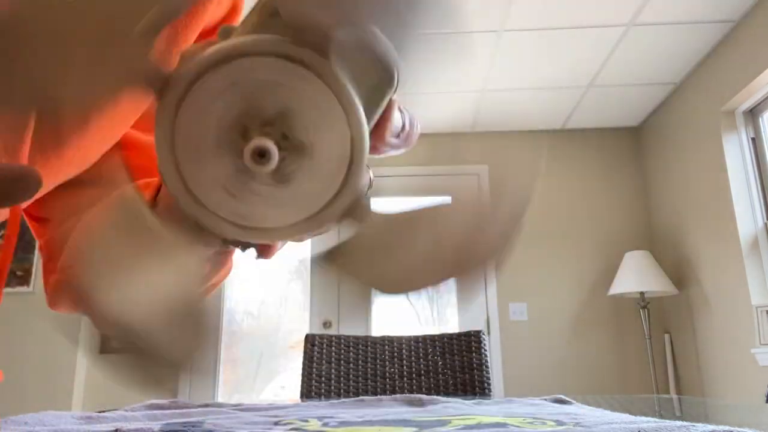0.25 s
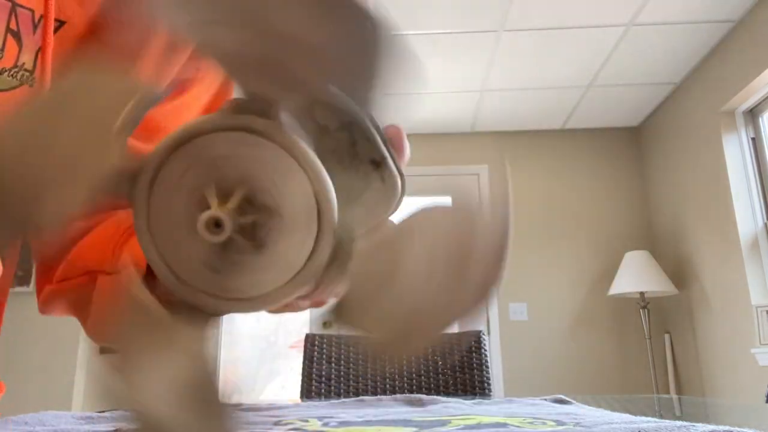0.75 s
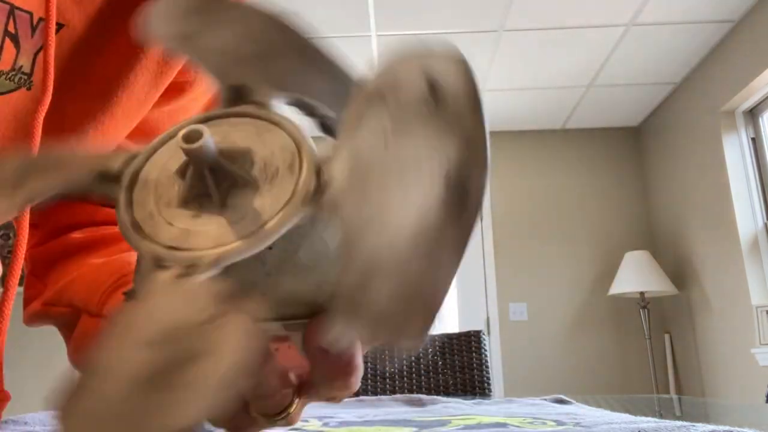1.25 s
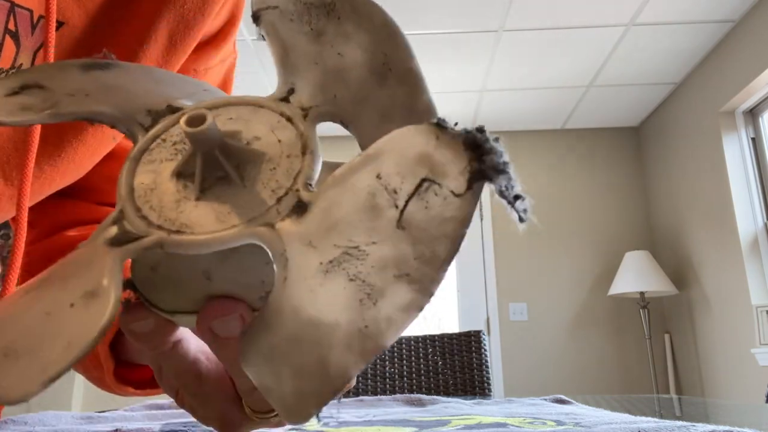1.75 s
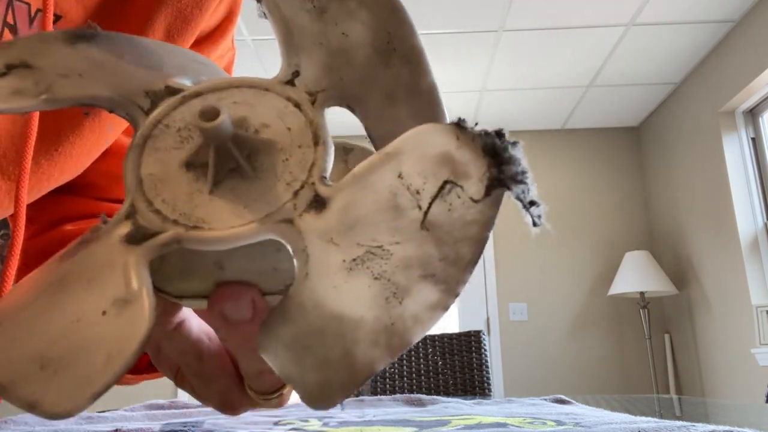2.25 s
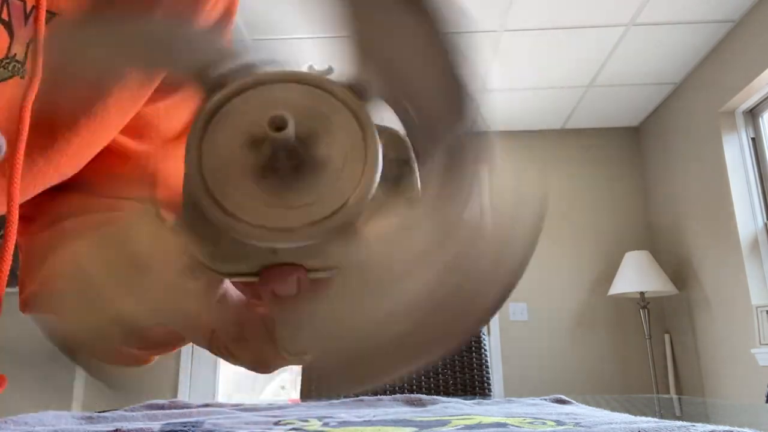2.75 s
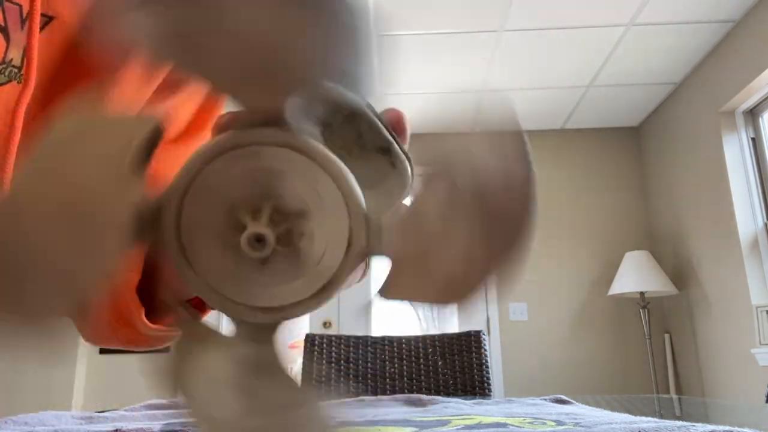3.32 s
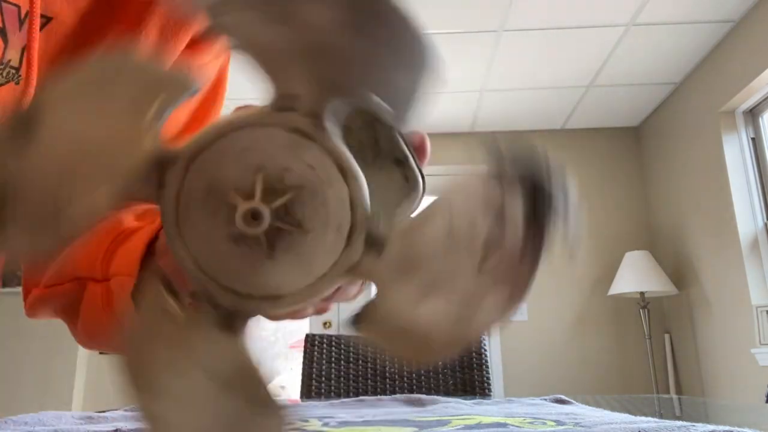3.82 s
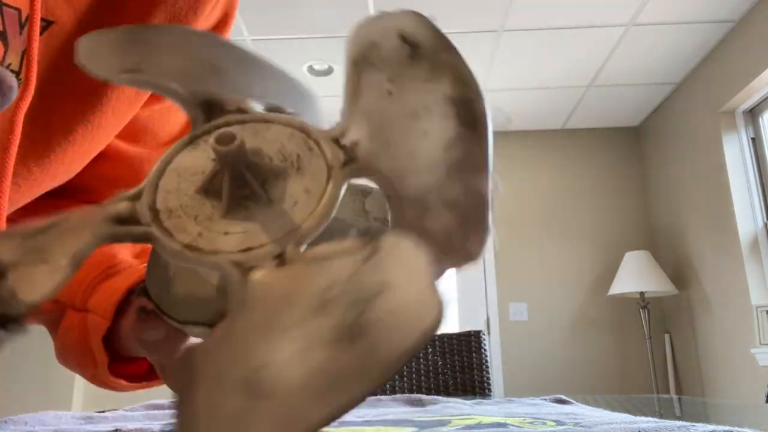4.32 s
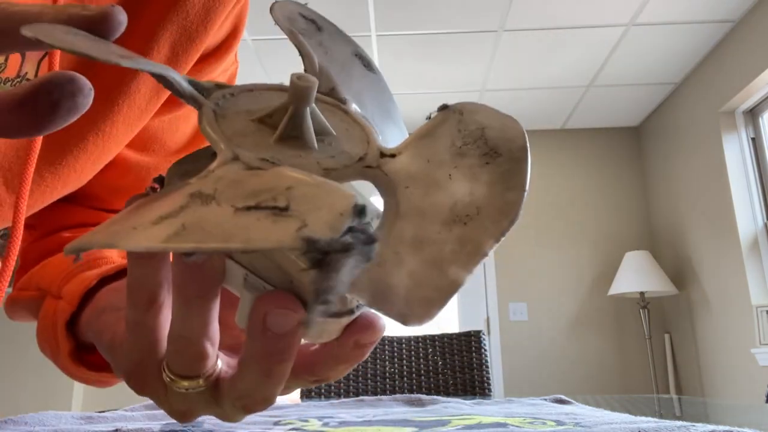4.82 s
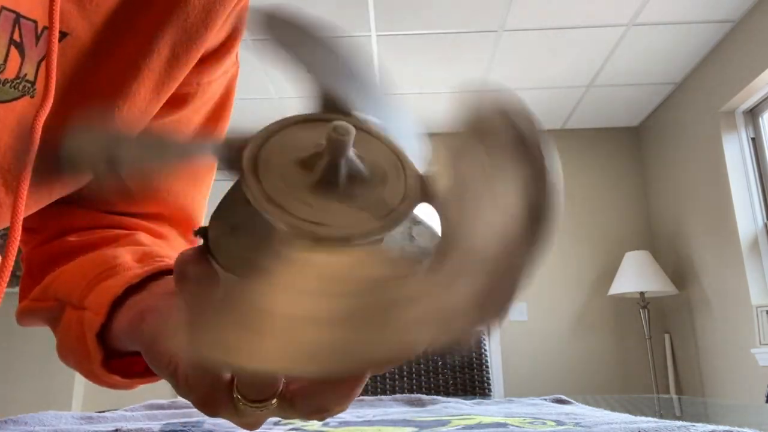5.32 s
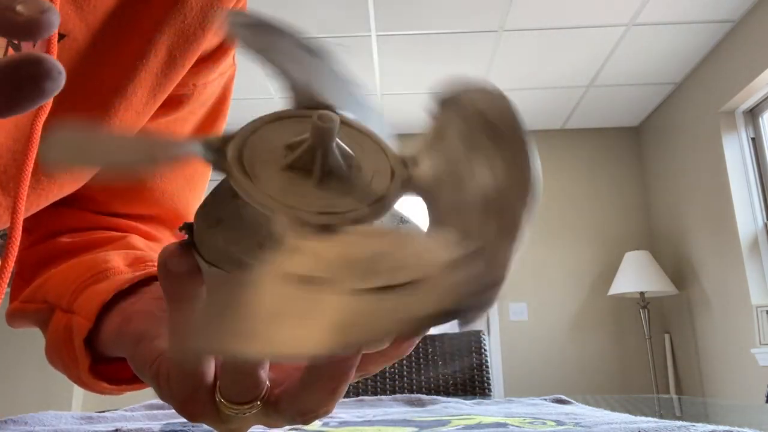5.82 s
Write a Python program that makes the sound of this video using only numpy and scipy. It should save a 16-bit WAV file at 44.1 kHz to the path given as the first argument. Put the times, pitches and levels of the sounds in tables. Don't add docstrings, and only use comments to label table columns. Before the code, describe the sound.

Dry bearing squeaks and piercing chirps from a hand-spun plastic fan, with soft blade swish, finger knocks and a final chattering squeal.

```python
import sys
import numpy as np
from scipy import signal
from scipy.fft import rfft, irfft
from scipy.io import wavfile
from scipy.ndimage import uniform_filter1d

SR = 44100
rng = np.random.default_rng(int(sys.argv[2]) if len(sys.argv) > 2 else 0)


def gain_from_db(level_db):
    decades = np.asarray(level_db, float) / 20
    return 10 ** decades


def output_pcm(signal):
    pcm = np.clip(np.atleast_2d(signal).T, -1, 1) * 32767
    wavfile.write(sys.argv[1], SR, np.round(pcm).astype(np.int16))


N = 267775
T, HZ = np.arange(N) / SR, np.fft.rfftfreq(N, 1 / SR)

HOLD_STARTS = [1.46, 2.2, 3.6, 4.6]
HOLD = np.searchsorted(HOLD_STARTS, T)


def evened(x):
    return x / np.sqrt(np.mean(x ** 2) + 1e-20)


def noise():
    return rng.standard_normal(N)


def read(points, hz):
    f, value = np.transpose(points)
    return np.interp(np.log(hz + 1), np.log(f + 1), value)


def follow(points):
    return np.interp(T, *np.transpose(points))


def coloured(x, points):
    return evened(irfft(rfft(x) * gain_from_db(read(points, HZ)), N))


def slow(hz):
    return evened(irfft(rfft(noise()) / (1 + (HZ / hz) ** 4), N))


def resonate(x, hz, width):
    turn = np.exp(2j * np.pi * np.cumsum(hz * np.ones(N)) / SR)
    r = np.exp(-np.pi * width / SR)
    return 2 * (turn * signal.lfilter([1 - r], [1, -r], x / turn + 1e-18)).real


def bumps(rows):
    return sum(db * np.exp(-((T - s) / width) ** 2) for s, db, width in rows)


def strikes(rows, fade_s):
    return sum(gain_from_db(db) * np.exp(-np.clip(T - s, 0, 1) / fade_s) * (T >= s) for s, db in rows)


def patchy(x, depth_db, size, above_hz):
    hz, t, z = signal.stft(x, SR, nperseg=512)
    patches = uniform_filter1d(rng.standard_normal(z.shape), size=14, axis=0)
    patches = evened(uniform_filter1d(patches, size=size, axis=1))
    return signal.istft(z * gain_from_db(depth_db * patches * (hz[:, None] > above_hz)), nperseg=512)[1][:N]


def controls(tables, axis=2):
    rows = np.concatenate(tables)
    s, *columns = rows[np.argsort(rows[:, 0])].T
    out = np.array([np.interp(T, s, c) for c in columns])
    best = np.full(N, -np.inf)
    for s, *columns in map(np.transpose, tables):
        part = slice(*np.searchsorted(T, [s[0] - .002, s[-1] + .002]))
        new = np.array([np.interp(T[part], s, c) for c in columns])
        out[:, part] = np.where(new[axis - 1] > best[part], new, out[:, part])
        best[part] = out[axis - 1, part]
    return uniform_filter1d((best > -np.inf) * 1., 130), *uniform_filter1d(out, 70)


def chained(rows, rule, lead, tail):
    tables = [rule(*rows[0])]
    for row in rows[1:]:
        if row[0] < tables[-1][-tail][0]:
            tables.append(tables.pop()[:-tail] + rule(*row)[lead:])
        else:
            tables.append(rule(*row))
    return tables


def hum():
    # pitch_hz, level_db per Hz
    air_tone = [(15, -31.5), (25, -0.5), (64, 0.5), (332, -9), (412, -12), (633, -15.5), (875, -11.5),
                (1120, -20), (1720, -25.5), (5460, -35), (10200, -38), (12900, -54), (15600, -57.5)]
    # pitch_hz, likeness
    likeness = [(60, 0.87), (180, 0.11), (550, 0.42), (1650, 0.068), (4970, 0.086), (15000, 0.41)]
    # time_s, gain_db, width_s
    rustles = [
        (0.0, 7, 0.077),
        (1.65, 8.5, 0.12),
        (2.55, 7, 0.25),
        (4.11, 6, 0.063),
    ]
    stir = gain_from_db(bumps(rustles)) - 1
    a, b = rfft(rng.standard_normal((2, N)))
    same = np.clip(read(likeness, HZ), -1, 1)
    z = np.array([a, same * a + np.sqrt(1 - same ** 2) * b]) * gain_from_db(read(air_tone, HZ))
    band = irfft(z[0] * (HZ > 200) * (HZ < 1000), N).std()
    air = (irfft(z, N) + stir * irfft(z / (1 + (HZ / 1900) ** 4), N)) / band
    mains = gain_from_db(-77 + 3 * slow(3)) * np.sin(2 * np.pi * 576 * T)
    return gain_from_db(-63.5 + 0.45 * slow(27)) * air + mains


def walls(x):
    # pitch_hz, t60_s
    decay = [(1600, 0.23), (4200, 0.21), (7000, 0.13), (13000, 0.11)]
    # pitch_hz, level_db
    wall_tone = [(1600, -6), (3000, 0), (10000, 0), (13000, -5)]
    taps = np.zeros(SR // 2)
    at = np.arange(300, len(taps) - 20, 20)
    taps[at + rng.integers(0, 20, len(at))] = rng.choice([-1., 1.], len(at))
    hz, t, z = signal.stft(taps, SR, nperseg=256)
    tail = signal.istft(z * gain_from_db(-60 * t / read(decay, hz)[:, None]), SR, nperseg=256)[1]
    x = irfft(rfft(x) * gain_from_db(read(wall_tone, HZ)), N)
    return signal.fftconvolve(x, tail / np.linalg.norm(tail))[:N]


def ports(x):
    # pitch_hz, lead_rad, balance_db
    differences = [
        [(310, -6, -2), (1560, -1.74, -5.5), (3120, 3, 1.5), (4700, -2, -2), (6230, 0.5, -5.5)],
        [(300.6, -0.95, -15.5), (1720, -2, -1), (3420, -1.4, 1.5), (5270, -0.36, -6.5), (7350, -0.32, -2)],
        [(300, 2.5, -2), (1700, 4.5, 3), (3500, 1.73, 3.5), (5270, -2, -1.5), (6596, -6, -3.5)],
        [(299, 11, 25), (1650, -2.5, -0.6), (3360, -1.36, 1.5), (4950, -1.5, -2.5), (6500, 0.8, -2.5)],
        [(324, 0.4, -3), (1118, 1, -3.5), (1545, -2.5, 0), (2008, 1.5, 2.5), (3000, -2.5, 0), (4170, 1.5, 0),
         (5500, 0.92, -4.5)],
    ]
    treble = [(8200, 0, 0), (10100, .65, 0), (11800, 1.45, 0), (13200, 2.07, 0), (15000, 2.7, 0)]
    side = np.zeros(N)
    for k, table in enumerate(differences):
        hz, lead, db = np.transpose(table + treble)
        ratio = gain_from_db(db) * np.exp(1j * lead)
        ratio = (ratio - 1) / (ratio + 1)
        shape = read(np.c_[hz, ratio.real], HZ) + 1j * read(np.c_[hz, ratio.imag], HZ)
        side += irfft(rfft(x * (HOLD == k)) * shape, N)
    return np.array([x + side, x - side])


def blow(s, db, hz, fade):
    return [(s - 0.064, db - 8.5, hz), (s, db, hz),
            (s + 0.3 * fade, db - 5.5, 0.95 * hz), (s + fade, db - 40.5, 0.84 * hz)]


def puffs():
    # peak_s, level_db, centre_hz, fade_s
    puff_rows = [
        (0.0, -39.5, 58.7, 0.34),
        (2.501, -27, 85.8, 0.23),
        (2.619, -34.5, 56.8, 0.72),
        (2.85, -33.5, 52, .3),
        (4.873, -45.5, 100.4, 0.21),
    ]
    # time_s, peak_db, pitch_hz
    gusts = [(2.457, -22.5, 105), (2.487, -29, 61), (2.517, -15, 68), (2.416, -27, 170), (2.471, -35, 330),
             (2.549, -33, 74.6), (2.572, -25.5, 84), (2.763, -35.5, 64)]
    gate, db, hz = controls([blow(*row) for row in puff_rows], axis=1)
    a, b = (evened(resonate(resonate(noise(), 0.68 * hz, 28), 0.914 * hz, 15.0)) for _ in "ab")
    a = evened(a / (abs(signal.hilbert(a)) + .2) ** .6)
    push = sum(gain_from_db(p) * np.exp(-((T - s) * f / 0.57) ** 2) * -np.sin(2 * np.pi * f * (T - s) + 2.3)
               for s, p, f in gusts)
    gate = uniform_filter1d(gate, 900)
    mid = gate * gain_from_db(db - 2.5) * a + push
    side = gate * gain_from_db(db - 9) * b
    return np.array([mid + side, mid - side])


def swish():
    # time_s, level_db
    strength = [
        [(0, -65), (.25, -72), (.5, -69.5), (.9, -65), (1.3, -66), (1.5, -61), (1.7, -84.5), (2.33, -77),
         (2.5, -58), (2.8, -67), (3.4, -72.5), (3.6, -74), (4.1, -71), (4.45, -80.5), (4.8, -79), (4.9, -60),
         (5.3, -65.5)],
    ]
    # pitch_hz, level_db per Hz
    tone = [(2350, -39.5), (4000, -15), (4350, -4.5), (6080, -17.5), (7990, -2.5), (10300, 0), (13500, -6),
            (14200, -28), (15500, -59.5)]
    # time_s, centre_hz
    whirr = [(0, 9220), (.6, 8600), (1.1, 10260), (2.5, 9300), (3.3, 9940), (4.8, 9080)]
    # time_s, gain_db, width_s
    whisks = [
        (4.755, 17.5, 0.014),
        (4.935, 9, 0.011),
    ]
    gate, db = controls(strength, axis=1)
    air = noise()
    air = air + gain_from_db(2) * resonate(air, follow(whirr), 3100)
    lumps = patchy(air, 3, 7, 6500)
    return gain_from_db(db + bumps(whisks) + 1.8 * slow(25)) * coloured(lumps, tone) * (T < 5.3)


def rub(s, drag, thud_db, hiss_db):
    touch_db = -57.5
    return [(s - drag, thud_db - 34.5, max(hiss_db - 34.5, touch_db - 4.5)),
            (s - 0.013, thud_db - 20, max(hiss_db - 20, touch_db)),
            (s, thud_db - 5.0, hiss_db),
            (s + 0.005, thud_db, hiss_db - 33.5), (s + 0.09, thud_db - 20, hiss_db - 34.5)]


def fingers():
    # release_s, drag_s, thud_db, hiss_db
    rubs = [
        (2.383, .02, -39, -50.5),
        (2.408, 0.048, -31, -29.5),
        (4.653, .055, -74, -54),
        (4.851, .052, -41, -30),
    ]
    # pitch_hz, level_db per Hz
    skin_tone = [(1470, -31), (2500, -5.5), (3100, -32), (3320, -3.5), (3720, 0), (4210, -8.5), (5900, 0.5),
                 (10500, 1.5), (15600, -14)]
    thud_tone = [(59, -40.5), (100, -2), (225, -2.5), (340, 3.5), (592, -16.5), (921, -5.5), (1560, -28),
                 (1880, -20), (2530, -26.5), (3000, -32.5), (3900, -82), (6600, -120)]
    # time_s, peak_db
    nail_ticks = [(2.3815, -30), (2.4045, -35), (2.4065, -33), (2.4085, -34), (2.4184, -40), (2.4329, -40),
                  (2.4624, -43), (4.7985, -46), (4.8469, -33), (4.8505, -30)]
    # time_s, gain_db, width_s
    knocks = [(2.364, 6, 0.0037), (2.414, -1, 0.0045), (2.436, 2.5, 0.0034), (2.448, 4.5, 0.0055),
              (4.832, 24, 0.0036), (4.865, 10.5, 0.0095), (4.892, 3, 0.0044), (4.915, 3, 0.0057)]
    gate, thud_db, hiss_db = controls([rub(*row) for row in rubs])
    hiss = coloured(gain_from_db(3 * slow(400)) * noise(), skin_tone)
    thud = coloured(gain_from_db(4.1 * slow(100)) * noise(), thud_tone)
    ticks = gain_from_db(-9.0) * strikes(nail_ticks, 0.00087)
    return gate * (gain_from_db(hiss_db) * hiss + gain_from_db(thud_db + bumps(knocks)) * thud) + ticks * hiss


def bite(s, length, rattle_db, grit_db):
    shape = [(s - 0.0066, -25.5), (s, 0), (s + length, 0), (s + length + 0.012, -25.5)]
    return [(t, rattle_db + d, grit_db + d) for t, d in shape]


def chatter(phase):
    # start_s, length_s, rattle_db, grit_db
    bouts = [(1.41, 0.013, -42.5, -38), (5.281, 0.065, -49, -46.5), (5.415, 0.14, -45, -42),
             (5.562, 0.11, -44, -41.5), (5.7, .006, -46.5, -36), (5.708, 0.0091, -38, -44),
             (5.721, 0.026, -49.5, -65.5), (5.761, 0.07, -45, -41), (5.828, 0.077, -45, -47.5),
             (5.886, 0.11, -42, -42.5), (6.017, .07, -44, -43)]
    # time_s, rocking_hz, drone_db
    rocking_bouts = [
        [(1.4, 338.4, -75), (1.412, 333.2, -48.5), (1.422, 333.7, -40.5), (1.436, 339.7, -39.5),
         (1.47, 330.4, -53.5)],
        [(5.27, 321.5, -77), (5.282, 337, -84), (5.298, 323.2, -48), (5.346, 314.2, -50.5), (5.362, 310.8, -69),
         (5.37, 321.7, -66)],
        [(5.4, 325, -86), (5.42, 333.5, -39.5), (5.49, 319.2, -51), (5.546, 317.9, -41), (5.658, 317.6, -47),
         (5.69, 314, -49)],
        [(5.695, 317.5, -62), (5.729, 332.4, -33.5), (5.795, 311.9, -54), (5.823, 343, -35),
         (5.979, 320.7, -38), (6.065, 338, -31)],
    ]
    # pitch_hz, level_db
    rattle_tone = [(500, -60.5), (770, -32.5), (920, -2), (1200, -6.5), (1900, 0), (2200, -2.5), (2600, -7),
                   (3300, -8.5), (3850, -5), (4400, -19), (5400, -38.5)]
    grit_tone = [(4200, -12), (5200, -10), (6600, -12.5), (7900, -6), (9800, -8.5), (13100, -11),
                 (14300, -16), (15900, -25)]
    # time_s, ratio
    looseness = [(1.42, 1.3), (5.3, 1.0), (5.42, .8), (5.5, .45), (5.6, .35), (5.65, .7), (5.71, 1.3),
                 (5.8, 1.1), (5.97, 1.2), (6.07, .7)]
    # time_s, depth_db, width_s
    stutter = [
        (5.853, -9.5, 0.039),
    ]
    # time_s, level_db above the grit
    jolts = [(5.815, 8), (5.8248, 11), (5.8319, 14.5), (5.842, 9), (5.8517, 10), (5.86, 10), (5.8681, 10.5),
             (5.8785, 10.5), (5.888, 7), (5.896, 7.5)]
    gate, rattle_db, grit_db = controls([bite(*row) for row in bouts])
    rocking, hz, drone_db = controls(rocking_bouts)
    rock = 2 * np.pi * np.cumsum(hz * (1 + .018 * slow(65))) / SR
    stroke = .35 + np.exp(-(rock / (2 * np.pi) % 1) / .3)
    spray = stroke * gain_from_db(3 * slow(110)) * noise()
    sides = sum(gain_from_db((4 if k < 0 else 2.5) * slow(40) - 2 * abs(k)) * np.sin(phase + k * rock + k * k)
                for k in range(-3, 9) if k)
    rattle = coloured(evened(sides) + follow(looseness) * evened(spray), rattle_tone)
    drone = gain_from_db(drone_db + 2.5 * slow(30)) * np.sqrt(2) * np.sin(rock)
    octave = gain_from_db(1.6 * drone_db + 11 + 2 * slow(30)) * np.sin(2 * rock + 1)
    stack = sum(gain_from_db(5.5 * slow(30)) * np.sin(k * phase + k * k) for k in range(4, 10))
    grit = coloured(evened(spray) + .35 * evened(stack), grit_tone)
    upper = resonate(resonate(grit, 11500, 5000), 11500, 7000)
    grit = gain_from_db(3.2 * slow(35)) * upper + gain_from_db(3.2 * slow(35)) * (grit - upper)
    grit, rattle = patchy(grit, 3, 5, 4000), patchy(rattle, 2.5, 6, 2000)
    grit_db = grit_db + bumps(stutter) + 20 * np.log10(1 + strikes(jolts, 0.0017))
    return rocking * (drone + octave) + gate * (gain_from_db(rattle_db + 7.5) * rattle + gain_from_db(grit_db) * grit)


def slip(s, length, db, hz, bright_db, climb_hz=None, sag_db=-4, creep_db=-25):
    over, end = db + bright_db, s + length
    sharp_hz, gone_db, bare_db = 151.3, -49.5, -36
    end_hz = hz + (2200 * min(length, 0.026) if climb_hz is None else climb_hz)
    return [(s - .028, hz + sharp_hz, db + gone_db, over + 2 * bare_db),
            (s - .0055, hz + sharp_hz, db + creep_db, over + bare_db),
            (s, hz, db, over),
            (end, end_hz, db + sag_db, over - 2),
            (end + 0.0056, end_hz + sharp_hz / 2, db - 9, over + 0.78 * bare_db),
            (end + 0.026, end_hz, db + gone_db, over + 2 * bare_db)]


def rough_bouts():
    # catch_s, length_s, level_db, slip_rate_hz, end_slip_rate_hz
    bouts = [
        (5.28, .065, -34, 1490, 1540),
        (5.432, .122, -33, 1550, 1580),
        (5.564, .114, -34, 1560, 1510),
        (5.7, .012, -31, 1500, 1400),
        (5.763, .055, -32.5, 1574, 1550),
        (5.833, 0.055, -35, 1593, 1590),
        (5.896, 0.15, -32, 1522, 1550),
    ]
    return controls([slip(s, length, db, hz, 0, end_hz - hz, -1.5, -14)
                     for s, length, db, hz, end_hz in bouts])


def slips():
    return 2 * np.pi * np.cumsum(rough_bouts()[1] * (1 + 0.0093 * slow(120))) / SR


def squeal(phase):
    # time_s, gain_db, width_s
    rings = [
        (5.29, 16.5, 0.0056),
        (5.462, 18.5, 0.011),
        (5.51, 4, 0.011),
        (5.6, 8, 0.15),
        (5.8, 21, 0.0065),
        (5.94, 15.5, 0.038),
    ]
    # time_s, gain_db, width_s
    yelps = [
        (5.284, 24.5, 0.009),
        (5.6, 20, 0.048),
    ]
    gate, hz, db, ring_db = rough_bouts()
    ring_db = np.maximum(ring_db, db - 18) - 14 + bumps(rings)
    fuzz = evened(resonate(resonate(noise(), 4510, 310), 4600, 470))
    ring = .8 * gain_from_db(2 * slow(80)) * np.sin(3 * phase) + .55 * gain_from_db(3 * slow(30)) * fuzz
    tone = np.sin(phase) + gain_from_db(bumps(yelps) - 29.0) * np.sin(2 * phase)
    return gate * (gain_from_db(db + 2.0 * slow(76)) * np.sqrt(2) * tone + gain_from_db(ring_db) * ring)


def housing(x):
    # time_s, null_hz
    turning = [(5.2, 4004), (5.3, 3890), (5.48, 3800), (5.55, 4040), (5.65, 3970), (5.8, 3800),
               (6.05, 4030)]
    # null_hz, width_hz
    dips = [(5720, 270), (6600, 114)]
    for _ in "ab":
        x = x - resonate(x, follow(turning), 320)
    cuts = [1 - .8 * np.exp(-((HZ - f) / w) ** 2) for f, w in dips]
    return irfft(rfft(x) * np.prod(cuts, axis=0), N)


def sing(s, length, db, hz, end_hz):
    end = s + length
    return [(s - .0065, hz + 150, db - 33), (s, hz, db - 5.5), (s + 0.15 * length, (hz + end_hz) / 2, db),
            (end, end_hz, db - 9.5), (end + 0.01, end_hz, db - 33)]


def whistle():
    # catch_s, length_s, level_db, pitch_hz, end_pitch_hz
    chirps = [
        (1.112, 0.035, -17.5, 13180, 13160),
        (2.853, 0.014, -17.5, 13000, 12970),
        (2.864, 0.016, -17.5, 13170, 12810),
    ]
    # time_s, pitch_hz, level_db
    warbles = [
        [(2.645, 13150, -37.5), (2.65, 12950, -13), (2.661, 13050, -13), (2.671, 13250, -20.5),
         (2.678, 13200, -39)],
        [(3.769, 13120, -39), (3.777, 13000, -21.5), (3.789, 13200, -19), (3.825, 13274, -13.5),
         (3.875, 13000, -27)],
        [(3.877, 12870, -24), (3.889, 13420, -14), (3.915, 13330, -13.5), (3.931, 13180, -18.5),
         (3.948, 13400, -37)],
        [(4.046, 12917, -39.5), (4.064, 13060, -26.5), (4.078, 12920, -19), (4.094, 12900, -29),
         (4.104, 13130, -44.5)],
        [(4.116, 13370, -37), (4.119, 13080, -25), (4.13, 13050, -28), (4.153, 12920, -28.5),
         (4.16, 12800, -44)],
    ]
    # pitch_hz, level_db per Hz
    splash_tone = [(9500, -29.5), (11000, 0.5), (14800, -4.5), (15800, -37.0)]
    gate, hz, db = controls(chained(chirps, sing, 1, 2) + warbles)
    db = np.minimum(db + .9 * np.minimum(db + 30, 0), -13)
    turns = np.cumsum(hz * (1 + 0.0012 * slow(120))) / SR
    growth = np.maximum(uniform_filter1d(np.gradient(gain_from_db(db)), 150) * SR / 100, 0)
    splash = gain_from_db(-33.5) * growth * coloured(noise(), splash_tone)
    return gate * (gain_from_db(db + .4 * slow(150)) * np.sqrt(2) * np.sin(2 * np.pi * turns) + splash)


def squeaks():
    # catch_s, length_s, level_db, slip_rate_hz, overtones_db above level
    slip_bouts = [(1.316, .04, -23, 1716, -10.5), (1.323, .04, -24, 1665, -7.5), (1.333, .04, -23.5, 1599, -3.5),
                  (1.346, .04, -22.5, 1556, -11.5), (1.365, .04, -24, 1525, -12.5),
                  (1.385, .04, -26.5, 1514, -8), (1.398, .04, -22.5, 1543, -18), (1.42, 0.0027, -26, 1514, -20),
                  (1.514, .05, -27, 1609, -0.5), (1.528, .05, -29, 1650, -5), (1.548, .12, -33, 1692, -0.5),
                  (1.645, .012, -41, 1737, -4.5), (2.777, 0.0085, -40, 1769, -9), (2.938, .03, -41, 1650, 6.5),
                  (2.946, .03, -33.5, 1639, 1.5), (2.96, .03, -34, 1698, 0.5), (3.092, .03, -26, 1614, -2),
                  (3.102, .03, -33.5, 1704, 0.5), (3.11, .03, -28.5, 1682, 5.5), (3.122, .03, -39.5, 1744, 7.5),
                  (3.14, .03, -32.5, 1709, 5.5), (3.15, 0.0043, -36, 1793, -17.5), (4.213, .02, -31, 1634, 4.5),
                  (4.222, .02, -27.5, 1614, 3.5), (4.231, .02, -26, 1633, -1), (4.239, .02, -40.5, 1678, 13),
                  (4.247, .004, -29.5, 1704, 1.5), (4.272, .03, -29.5, 1630, 1), (4.292, .05, -28.5, 1629, 0.5),
                  (4.328, .03, -29.5, 1649, 3.5), (4.344, .04, -37, 1695, 3), (4.374, .03, -35, 1714, -1),
                  (4.388, 0.0044, -40, 1700, -1), (5.108, .008, -35.5, 1624, -7.5), (5.183, .02, -39, 1700, -5),
                  (5.195, .006, -38, 1620, -2.5), (5.207, .02, -40.5, 1720, -16), (5.219, 0.012, -36, 1720, -16),
                  (5.394, .03, -31.5, 1560, -2), (5.413, .004, -30.5, 1520, -10.5),
                  (1.251, .06, -73.5, 1975, -34), (1.303, .02, -57.5, 1930, -31.5),
              (1.503, .02, -36.5, 1750, -22), (1.31, .02, -32, 1879, -13.5),
              (2.553, 0.0044, -53.5, 1587, -19), (2.649, .01, -53, 1807, -34.5),
              (2.926, .02, -37, 1720, -15.5), (2.971, 0.004, -38.5, 1876, -29.5),
              (3.312, .055, -61.5, 1787, -23.5), (4.19, .03, -54.5, 1795, -48),
              (4.207, .02, -33, 1780, -21), (4.263, .02, -40, 1700, -11.5),
              (5.126, .005, -36.5, 1790, -14.5), (5.259, .02, -51.5, 1797, -38),
              (5.273, .003, -36, 1742, -14), (5.385, .02, -39.5, 1717, -17), (5.403, .02, -28.5, 1518, -9),
                  (1.58, .1, -33, 1702, -4.5), (1.606, .1, -35.5, 1735, -10.5), (1.63, .1, -39.5, 1758, -4.5),
            (2.755, .03, -65.5, 1785, -24), (3.086, .02, -43.5, 1700, -5),
            (4.983, 0.0046, -44.5, 1650, -7.5), (5.101, .02, -43.5, 1746, -19),
            (5.175, .02, -47, 1787, -18)]
    stacks = [
        [-14.5, -15.5, -17.5, -14.5, -9.5, -15, -21.5, -22],
        [-22.5, -10.5, -2.5, -2, -2.5, -14, -29, -70.5],
        [0, -8, -11.5, -7, -16, -15.5, -9.5, -45],
        [-5.5, -3.5, -16, -3.5, -5.5, -15.5, -19.5, -26],
        [-4, -8.5, -20, -10.5, -7.5, -14, -11, -20],
    ]
    roughness = [.33, .1, .22, .08, .55]
    # null_hz, width_hz, depth_db
    path_nulls = [
        [(3120, 150, -10), (4700, 26, -9.5)],
        [(3340, 170, 13.5), (6450, 270, -23.5)],
        [(5000, 83, -15), (6800, 56, -10.5)],
        [(5146, 170, -11.5), (3440, 40, -13)],
        [(3140, 150, -10), (3090, 170, -11)],
    ]
    tops = [14250, 14300, 13000, 15000, 14200]
    # pitch_hz, level_db per Hz
    grit_tone = [(1200, -21.5), (2500, 0.5), (4500, -8), (6000, -16), (8000, -1.5), (13500, 0.5),
                 (14800, -31)]
    gate, hz, db, over_db = controls(chained(sorted(slip_bouts), slip, 2, 3))
    over_db = over_db + .7 * np.minimum(over_db + 50, 0)
    rough = np.array(roughness)[HOLD]
    phase = 2 * np.pi * np.cumsum(hz * (1 + 0.024 * rough * slow(340))) / SR
    heights = gain_from_db(np.array(stacks))
    heights = heights / np.linalg.norm(heights[:, :6], axis=1, keepdims=True)
    dull = 0.18 * np.clip(over_db + 41, -20, 0)
    null_hz, width_hz, depth_db = np.array(path_nulls)[HOLD].T
    top_hz = np.array(tops)[HOLD]
    over = 0
    for k, height in enumerate(heights.T):
        pitch = (k + 2) * hz
        null_db = (depth_db * np.exp(-((pitch - null_hz) / width_hz) ** 2)).sum(0)
        level = height[HOLD] * gain_from_db(1.6 * slow(60) + null_db + k * dull)
        over = over + level / (1 + (pitch / top_hz) ** 24) * np.sin((k + 2) * phase + k * k)
    catch = np.clip(uniform_filter1d(np.gradient(over_db), 200) * 3 - .06, 0, 0.18)
    grit = (.55 * rough ** 2 + catch) * (1 + np.cos(phase)) * coloured(noise(), grit_tone)
    tone = gain_from_db(db + 1.4 * rough * slow(260)) * np.sin(phase)
    return gate * np.sqrt(2) * (tone + gain_from_db(over_db) * (over + grit))


def scene():
    hold_room_db = [-1.5, -1, 0, -6, -0.5]
    phase = slips()
    near = whistle() + squeaks() + housing(squeal(phase) + chatter(phase)) + fingers()
    room = gain_from_db(-14.5) * walls(near * gain_from_db(hold_room_db)[HOLD])
    spread = gain_from_db(-25.5) * walls(resonate(near, 2500, 4000)) * [[1], [-1]]
    return ports(near + room + swish()) + spread + puffs() + hum()


def band_limit(x):
    return signal.sosfilt(signal.butter(12, 15770, fs=SR, output="sos"), x)


def record(dry):
    edges = HZ ** 4 / (HZ ** 4 + 30 ** 4) / (1 + (HZ / 15300) ** 40)
    return band_limit(irfft(rfft(dry) * edges, N))


dry = scene()
out = record(dry)
output_pcm(out)
```